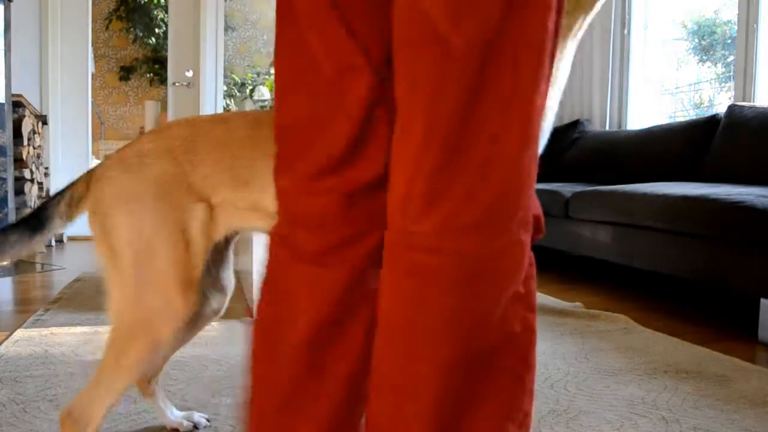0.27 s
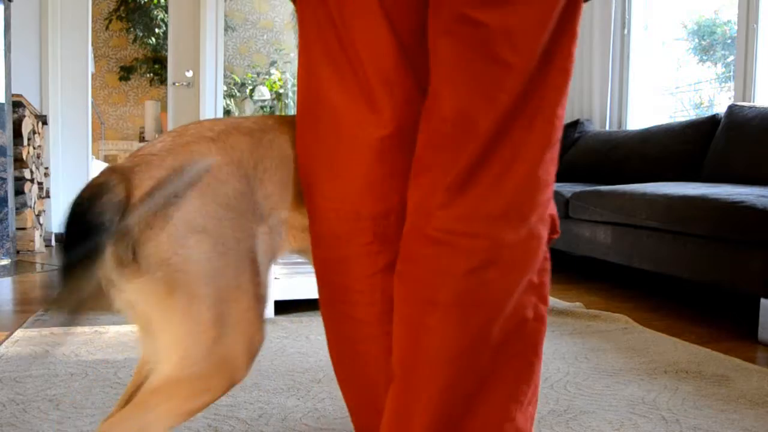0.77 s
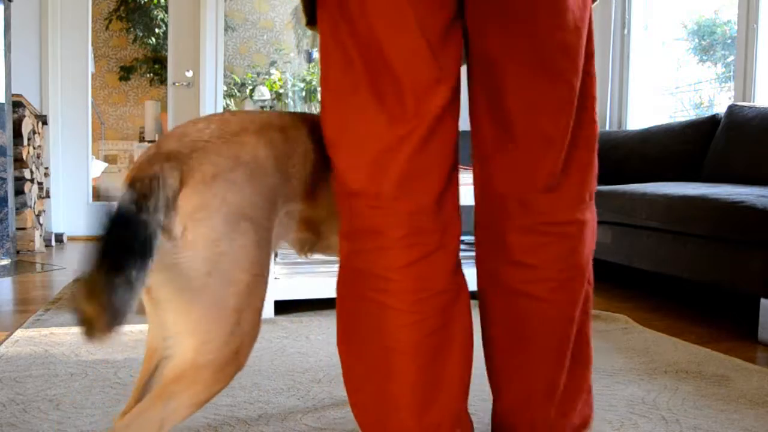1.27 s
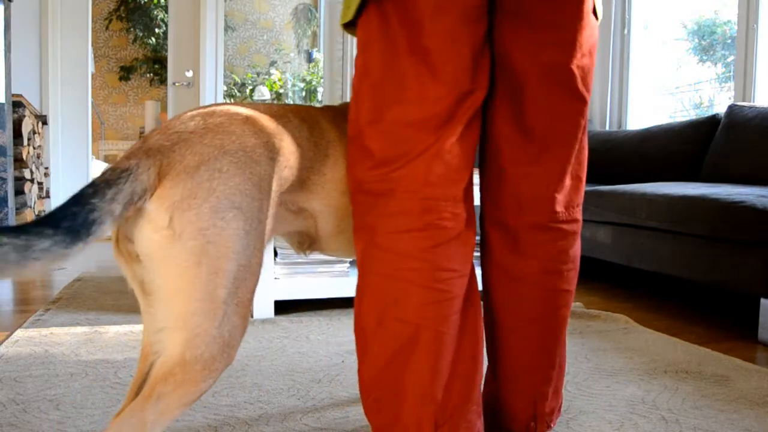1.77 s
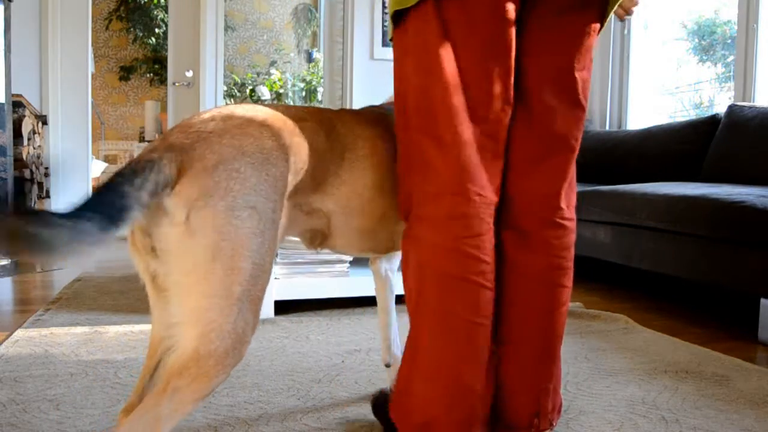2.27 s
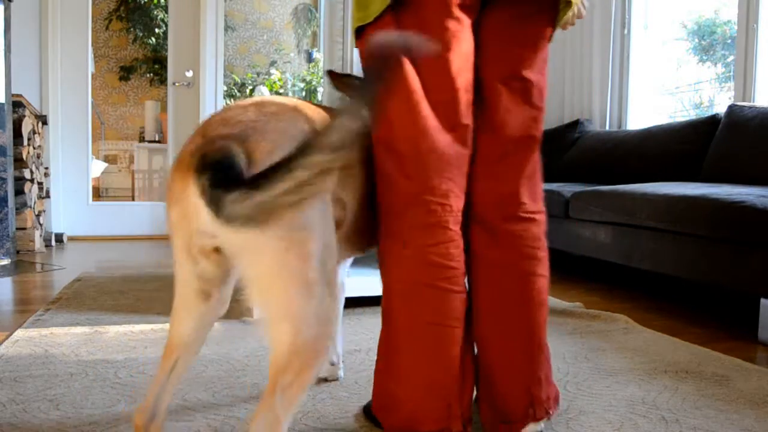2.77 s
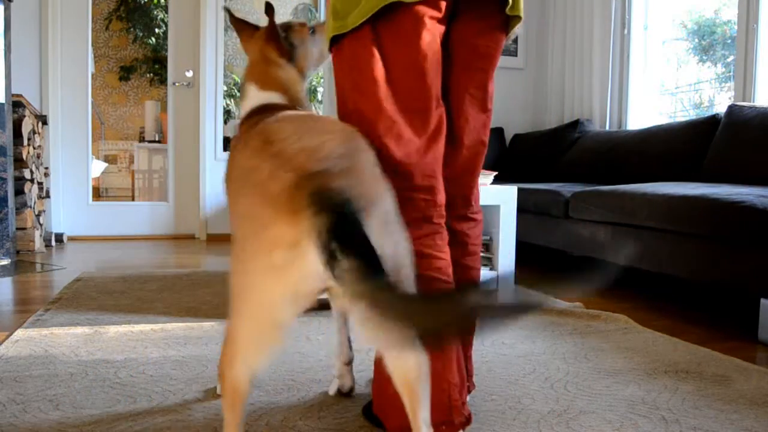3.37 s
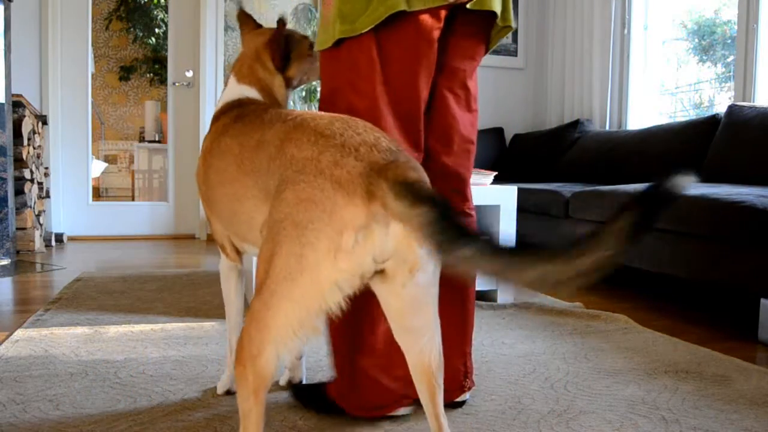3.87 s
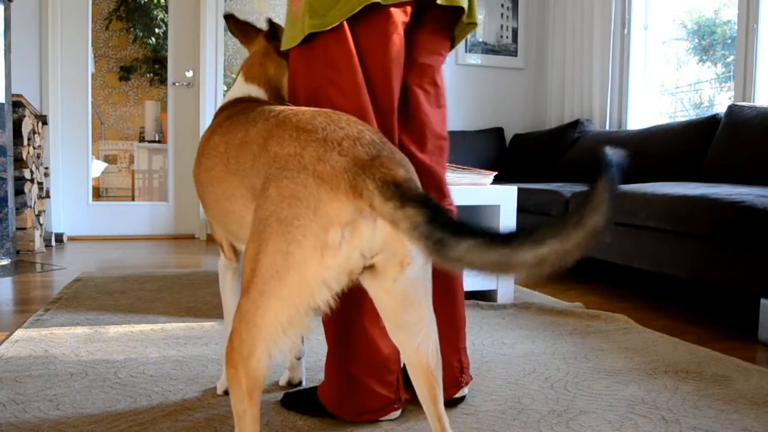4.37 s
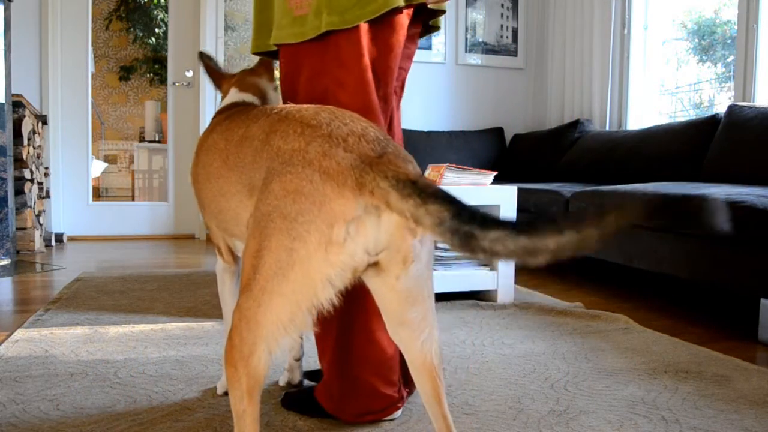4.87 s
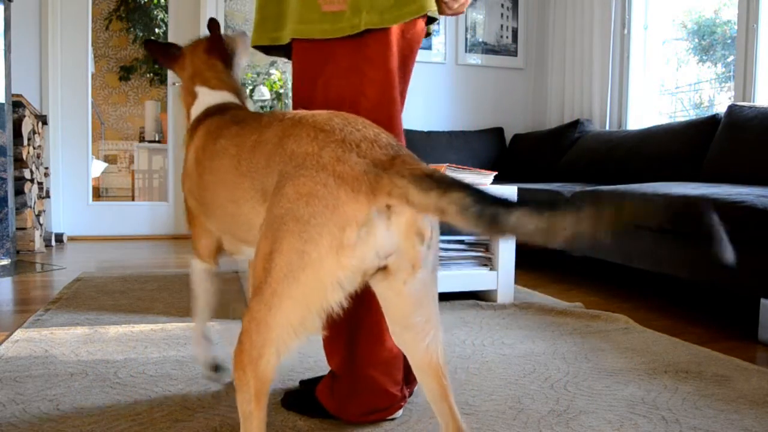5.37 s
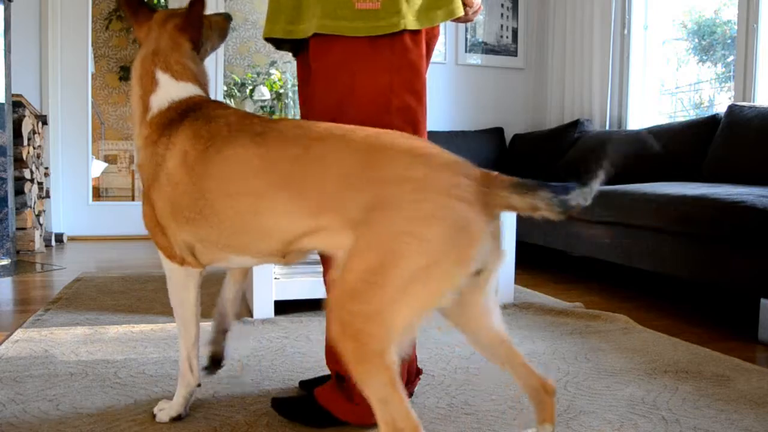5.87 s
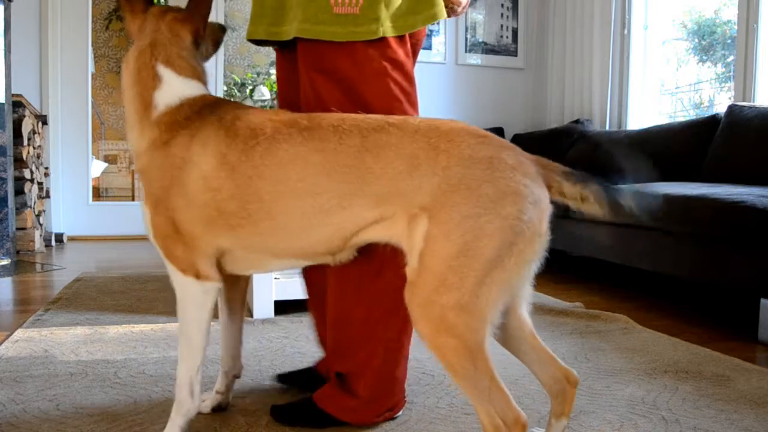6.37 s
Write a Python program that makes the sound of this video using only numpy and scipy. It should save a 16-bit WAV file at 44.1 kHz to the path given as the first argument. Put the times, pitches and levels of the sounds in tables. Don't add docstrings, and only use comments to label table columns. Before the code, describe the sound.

A metal training clicker snaps sharply close to the microphone in a living room while a dog and handler shuffle softly on a rug.

```python
import sys
import numpy as np
from scipy import signal
from scipy.fft import rfft, irfft, next_fast_len
from scipy.io import wavfile

SR = 44100
rng = np.random.default_rng(int(sys.argv[2]) if len(sys.argv) > 2 else 0)


def invert_db(level):
    return 10 ** (np.asarray(level, dtype=float) / 20)


def generate_wav(sig):
    pcm = np.round(np.clip(np.atleast_2d(sig).T, -1, 1) * 32767).astype(np.int16)
    wavfile.write(sys.argv[1], SR, pcm)


N = 292659


def clicker():
    # (time [s], peak [dB], diaphragm push [dB], low shading [dB], top shading [dB])
    presses = [
        (1.1392, 1, 7, -16, -6.5),
        (3.5921, 1, -25, 3.5, 0),
        (6.441, -4.5, -17, -1, -25),
    ]
    # (time [s], peak [dB], diaphragm push [dB], low shading [dB], top shading [dB])
    releases = [
        (1.3127, 1.9, -3.5, -8, 8.5),
        (3.7747, 1.2, -9.5, -4, -9.5),
    ]
    # (frequency [Hz], level [dB], t60 [s])
    press_modes = [(1890, -17, 0.013), (2550, -32, 0.0022), (2900, -11.5, 0.003), (3784, -10, 0.055),
                   (4320, -12, 0.012), (4860, -12.5, 0.011), (5087, -13.5, 0.014), (5670, -18.5, 0.022),
                   (6820, -8, 0.016), (7196, -1, 0.0083), (8083, -8, 0.01), (8860, -6.5, 0.0061),
                   (9820, -26, 0.0057)]
    # (frequency [Hz], level [dB], t60 [s])
    release_modes = [(2080, -10.5, 0.042), (2715, -5.5, 0.0055), (3640, 0.5, 0.0045), (4190, -4, 0.012),
                     (5155, 1, 0.0088), (5560, -13.5, 0.023), (6080, -10.5, 0.033), (6940, 2, 0.0029),
                     (8680, -6.5, 0.0075), (9906, 0, 0.0029)]
    # (delay [s], level [dB])
    walls = [
        (0.012, -24.5),
        (.026, -25.5),
        (.042, -8),
        (.057, -5),
    ]
    room_db = -39.5
    fade_s, echo_blur_s = 0.004, 0.0055
    out, t = np.zeros(N), np.arange(2048) / SR
    for snaps, modes, damping_s in ((presses, press_modes, 0.0042), (releases, release_modes, 0.0035)):
        for s, peak_db, push_db, low_db, top_db in snaps:
            direct = band(strike(modes, 0.94, low_db, top_db), 1.42 * modes[0][0], 19000)
            direct = direct * np.exp(-(t / damping_s) ** 3 - t / fade_s)
            push = band(np.minimum(direct ** 2, 0.3) * np.exp(-t / 0.00025), 260, 2940, order=1)
            push = band(push, 100, 6000, order=1)
            add(out, s + 0.00056, invert_db(peak_db) * direct + invert_db(push_db + 6) * push)

            blurred = modes_rung(modes, 0.5) * np.exp(-t / echo_blur_s)
            echoes = band(room(blurred, 0.7), 1620, SR / 2.5, order=6)
            add(out, s + 0.0005, invert_db(room_db) * echoes)
            for delay_s, wall_db in walls:
                gain = invert_db(room_db + 22.5 + wall_db + rng.normal(0, 2))
                add(out, s + delay_s, gain * band(strike(modes, 2.5), 1500, 19000))
    return out


def strike(modes, spread_db, low_db=0, top_db=0):
    direct = modes_rung(modes, spread_db, low_db, top_db).sum(axis=0)
    return direct / np.abs(direct).max()


def modes_rung(modes, spread_db, low_db=0, top_db=0):
    hz, db, t60 = np.transpose(modes)
    db = db + rng.normal(0, spread_db, len(modes)) + low_db * (hz < 4500) + top_db * (hz > 8000)
    click = band(np.eye(1, 2048)[0], 0.6 * hz[0], 18000)
    return np.array([(-1) ** k * invert_db(db[k]) * ring(click, hz[k], t60[k]) for k in range(len(modes))])


def ring(x, hz, t60):
    r, w = invert_db(-60 / (t60 * SR)), 2 * np.pi * hz / SR
    return signal.lfilter([0, np.sin(w)], [1, -2 * r * np.cos(w), r * r], x)


def room(rings, length_s, gap_s=0.00085, build_s=0.0086):
    # (frequency [Hz], t60 [s])
    room_t60 = [(500, 0.22), (2000, 0.5), (4000, 0.5), (6000, 0.53), (9000, 0.39)]
    t = np.arange(next_fast_len(round(length_s * SR), True)) / SR
    band_edges = 350 * 2.0 ** np.arange(0, 5.3, 0.65)
    white = rng.standard_normal((2, len(t))) * invert_db(2.6 * rng.standard_normal((2, len(t))))
    echoes = np.zeros(len(t))
    for k, (low, high) in enumerate(zip(band_edges, band_edges[1:])):
        decay = invert_db(-60 * t / at_hz(room_t60, np.sqrt(low * high)))
        echoes += band(white[k % 2], low, high) * decay
    echoes = echoes * (1 - np.exp(-np.maximum(t - gap_s, 0) / build_s))
    power = np.sum(np.abs(rfft(rings, len(t))) ** 2, axis=0)
    colour = np.sqrt(power) / np.abs(rings.sum(axis=0)).max()
    return irfft(rfft(echoes) * colour, len(t))


def knocks():
    # (time [s], peak [dB], pitch [Hz])
    ticks = [(0.241, -54, 996), (0.663, -50, 1200), (0.686, -43, 2750), (1.018, -53, 970),
             (1.049, -55, 1070), (1.684, -45, 2720), (1.899, -66.5, 843), (2.549, -49, 738),
             (3.254, -46, 3420), (3.481, -40.5, 1090), (4.188, -53, 2820), (4.307, -46, 960),
             (4.805, -43.5, 2630), (4.939, -49.5, 2880), (5.589, -40.5, 2750), (5.919, -47, 1380),
             (5.934, -54.5, 422), (.003, -55.5, 400), (6.219, -48, 930)]
    # (time [s], peak [dB], skid [s])
    stomp = [
        (6.2876, -34.5, 0.017),
        (6.2969, -31, 0.0031),
        (6.2991, -24, 0.0039),
        (6.31, -33, .003),
        (6.318, -33.5, 0.004),
    ]
    # (frequency [Hz], level [dB], t60 [s])
    board = [(830, -6.5, 0.006), (1200, -5.5, 0.0089), (1900, -4.5, 0.0054), (2620, -2.5, 0.0063),
             (3440, -7.5, 0.0044), (4240, -5.5, 0.0038), (5600, -9, 0.0018), (6500, -20, 0.0037),
             (9400, -10.5, 0.0022)]
    out, t = np.zeros(N), np.arange(1024) / SR
    for s, peak_db, hz in ticks:
        claw = [(hz, 0, 0.006), (0.84 * hz, -6, 0.004), (1.25 * hz, -3, 0.004), (1.55 * hz, -5, 0.004),
                (9300, -16, 0.003)]
        add(out, s, invert_db(peak_db + 2) * strike(claw, 0.73))
        add(out, s, invert_db(peak_db - 34.5) * room(modes_rung(claw, 1.5), 0.15, gap_s=0.00091))
    for s, peak_db, skid_s in stomp:
        skid = rng.standard_normal(len(t)) * np.exp(-t / skid_s) / np.sqrt(skid_s * SR)
        add(out, s, invert_db(peak_db + 5.5) * np.convolve(strike(board, 3.3), skid))
        add(out, s, invert_db(peak_db - 31) * room(modes_rung(board, 0.83), 0.42, gap_s=0.00069))
    return out


def shuffle():
    # (start [s], hold [s], level [dB])
    scuffs = [(.0, 0.052, -77), (0.22, 0.059, -63), (0.323, 0.3, -65), (0.659, 0.035, -59),
              (0.765, 0.29, -64), (0.993, 0.074, -62), (2.17, .05, -66), (2.48, 0.064, -63.5),
              (2.773, 0.049, -66.5), (3.165, 0.044, -58), (3.447, 0.074, -61.5), (4.217, 0.082, -49),
              (4.338, 0.045, -59), (5.21, 0.073, -81), (5.73, 0.06, -61.5), (5.908, 0.033, -57),
              (6.2, 0.15, -63.5)]
    # (start [s], hold [s], level [dB], brightness [dB])
    rustles = [(.0, 0.042, -67, -2.5), (0.149, 0.15, -61.5, -4), (0.335, 0.29, -64.5, -5),
               (0.673, 0.031, -59, -9), (0.776, 0.28, -62.5, -7), (1.673, 0.11, -65, -3),
               (1.885, 0.05, -60.5, -2.2), (2.173, 0.039, -62, -9.5), (2.282, 0.031, -65, -15),
               (2.338, 0.065, -67.5, 1.5), (2.449, .05, -58, -6), (2.53, 0.057, -63, -7),
               (2.646, 0.072, -61.5, -8), (2.782, 0.059, -64.5, -8), (3.162, .06, -62.5, -10),
               (3.24, 0.043, -60.5, -4), (3.433, 0.1, -63.5, -8), (4.178, 0.036, -61, -3.5),
               (4.302, 0.027, -58.5, -2), (4.397, 0.19, -71, -0.5), (4.792, 0.025, -69, -9.5),
               (4.843, 0.028, -79, 4.5), (4.934, 0.045, -66.5, -5), (5.022, 0.038, -81.5, 10.5),
               (5.22, 0.048, -68, -14), (5.577, .04, -63.5, -15), (5.732, 0.055, -69, -12.5),
               (5.913, 0.032, -64, -4), (6.137, 0.07, -64.5, -4.5)]
    # (scuff [dB], cloth [dB], pile [dB], fur [dB])
    fidget_db = (-70.5, -75, -80, -87)
    scuff = strokes(*np.transpose(scuffs), attack_s=0.015, release_s=0.055)
    s, hold_s, db, bright_db = np.transpose(rustles)
    cloth = strokes(s, hold_s, db, attack_s=0.0027, release_s=0.059)
    sheen = strokes(s, hold_s, db + bright_db, attack_s=0.0027, release_s=0.059)
    moving = [scuff, cloth, invert_db(0.5) * sheen, invert_db(0.4) * sheen]
    scuff, cloth, pile, fur = np.hypot(moving, invert_db(np.array(fidget_db))[:, None])
    return (scuff * friction(1100, 4.3, 560, 1634)
            + cloth * friction(3000, 3.5, 2100, 4530)
            + pile * friction(5000, 4.7, 4750, 7400)
            + fur * friction(5000, 3, 7950, 10100))


def friction(per_s, spread_db, low_hz, high_hz):
    sizes = invert_db(spread_db * np.minimum(rng.exponential(1, N), 4)) * rng.choice([-1, 1], N)
    grains = (rng.random(N) < per_s / SR) * sizes
    return rms_one(band(rms_one(grains) + 1.4 * rng.standard_normal(N), low_hz, high_hz))


def strokes(s, hold_s, db, attack_s, release_s):
    t = np.arange(0, N, 32)[:, None] / SR - s
    rise = 1 - np.exp(-np.maximum(t, 0) / attack_s)
    fall = np.exp(-np.maximum(t - hold_s, 0) / release_s)
    strength = np.sqrt(np.sum((invert_db(db) * rise * fall) ** 2, axis=1))
    return np.interp(np.arange(N) / 32, np.arange(len(t)), strength)


def thuds():
    # (start [s], hold [s], level [dB])
    shifts = [
        (0.323, .05, -73),
        (.4, .03, -76),
        (1.02, .02, -84),
        (3.17, .03, -79),
    ]
    rumble = rms_one(band(rng.standard_normal(N), 25, 110))
    return strokes(*np.transpose(shifts), attack_s=0.01, release_s=0.015) * rumble


def hiss():
    # (frequency [Hz], density [dB per Hz])
    hiss_colour = [(18, -72), (30, -17.5), (268, -4.5), (335, -3), (390, -3.5), (822, -2), (1460, -9),
                   (2780, -4), (3150, -6.5), (7920, -14), (8970, -8.5), (10700, -16), (11500, -32.5),
                   (15000, -55), (22000, -120)]
    # (frequency [Hz], width [Hz], level [dB])
    appliance = (341, 5.3, -79.5)
    hiss_db = -62.5
    hz = np.maximum(np.arange(N // 2 + 1) * SR / N, 1)
    noise = rms_one(irfft(rfft(rng.standard_normal(N)) * invert_db(at_hz(hiss_colour, hz)), N))
    hum_hz, width_hz, hum_db = appliance
    hum = rms_one(band(rng.standard_normal(N), hum_hz - width_hz / 2, hum_hz + width_hz / 2))
    return invert_db(hiss_db) * noise + invert_db(hum_db) * hum


def rms_one(x):
    return x / np.sqrt(np.mean(x ** 2) + 1e-20)


def at_hz(points, hz):
    return np.interp(np.log(hz), np.log(np.array(points)[:, 0]), np.array(points)[:, 1])


def band(x, low_hz, high_hz, order=2):
    return signal.sosfilt(signal.butter(order, [low_hz, high_hz], "band", fs=SR, output="sos"), x)


def add(out, s, sound):
    i = round(s * SR)
    out[i:i + len(sound)] += sound[:N - i]


def scene():
    return (clicker() + knocks() + shuffle() + thuds() + hiss())[None]


def top_cut(x):
    return signal.sosfilt(signal.butter(12, 17080, fs=SR, output="sos"), x)


def record(dry):
    notch_hz, notch_width_hz, notch_depth = 7880, 200, 0.47
    clip_level, lopsided, treble_cut = 0.47, 0.21, 0.75
    dip = signal.lfilter(*signal.iirpeak(notch_hz, notch_hz / notch_width_hz, fs=SR), dry)
    x = signal.sosfilt(signal.cheby2(14, 72, 12500, fs=SR, output="sos"), dry - notch_depth * dip)
    x = clip_level * np.tanh((np.abs(x) / clip_level) ** 10) ** (1 / 10) * np.sign(x)
    x = x - lopsided * np.maximum(np.abs(x) - 0.41, 0)
    treble = signal.sosfiltfilt(signal.butter(6, 12000, "high", fs=SR, output="sos"), x)
    x = x - treble_cut * treble
    x = signal.sosfilt(signal.cheby2(12, 70, 17400, fs=SR, output="sos"), x)
    return top_cut(x)


dry = scene()
out = record(dry)
generate_wav(out)
```